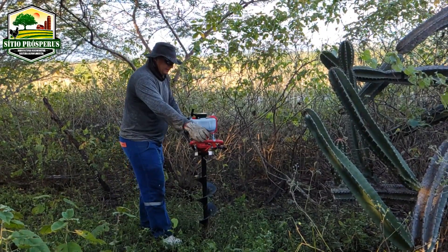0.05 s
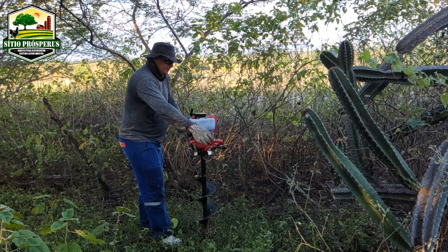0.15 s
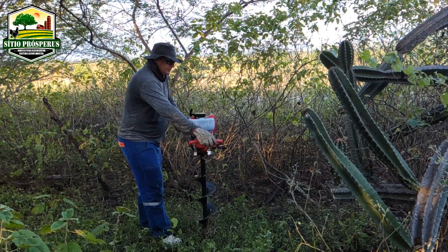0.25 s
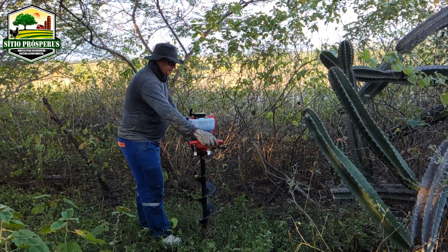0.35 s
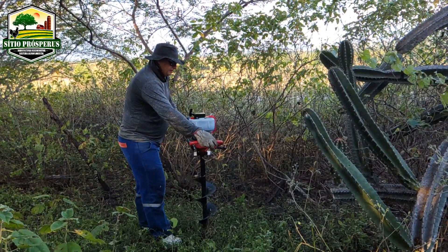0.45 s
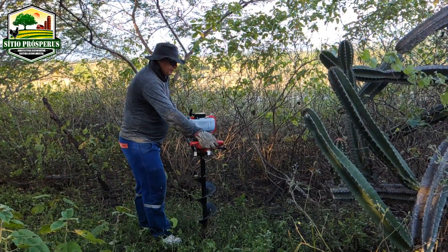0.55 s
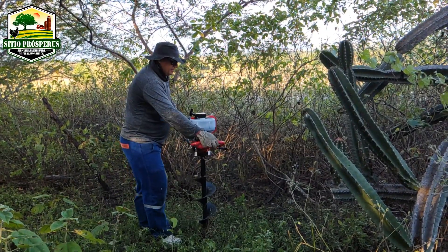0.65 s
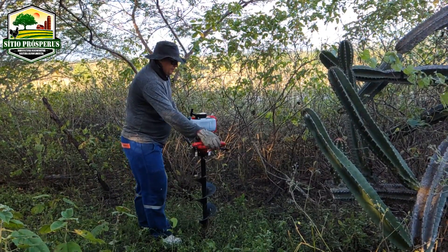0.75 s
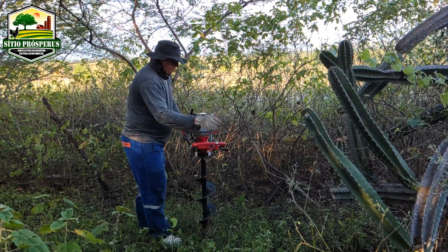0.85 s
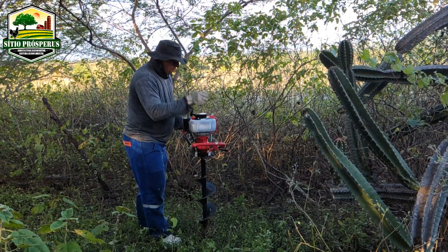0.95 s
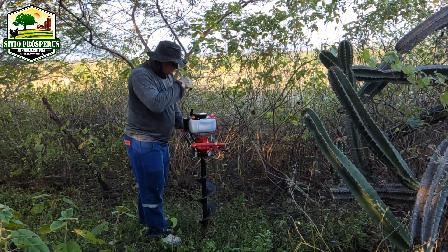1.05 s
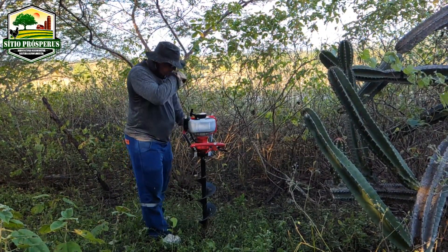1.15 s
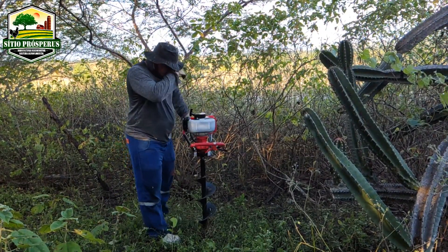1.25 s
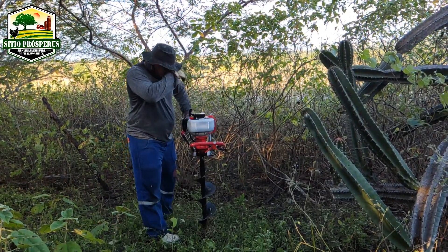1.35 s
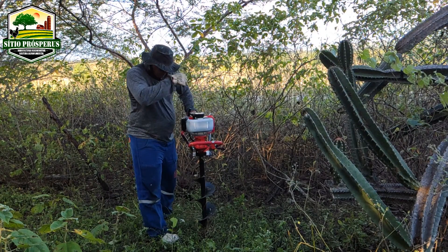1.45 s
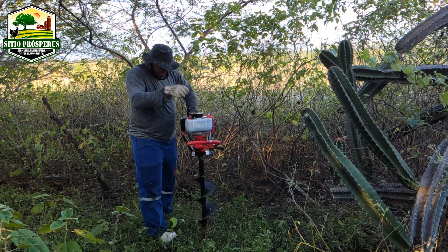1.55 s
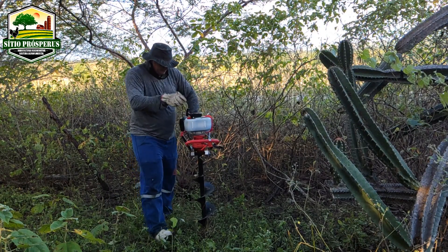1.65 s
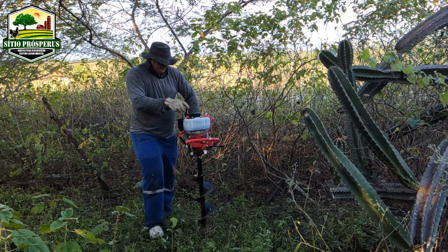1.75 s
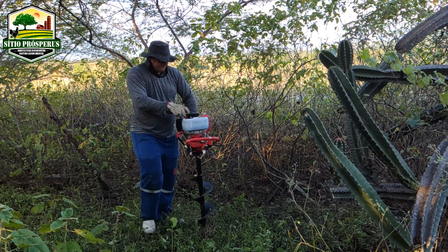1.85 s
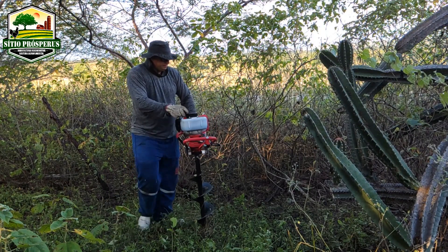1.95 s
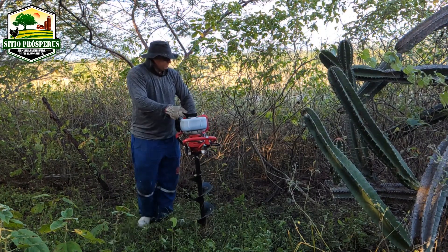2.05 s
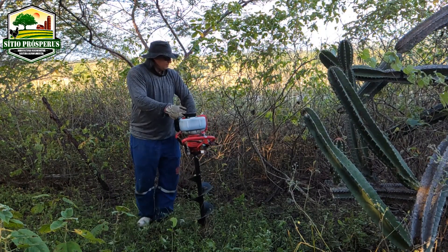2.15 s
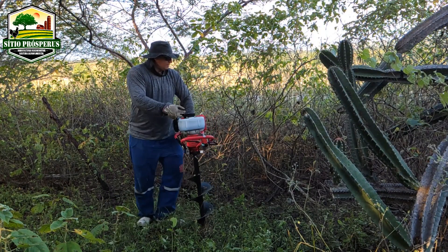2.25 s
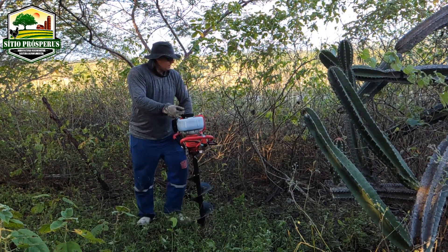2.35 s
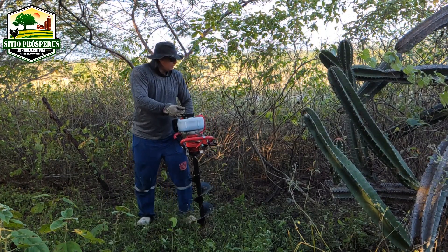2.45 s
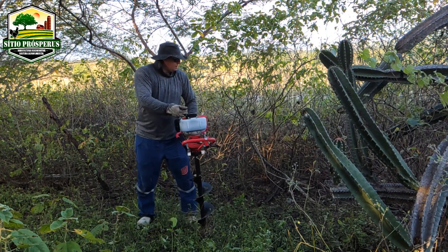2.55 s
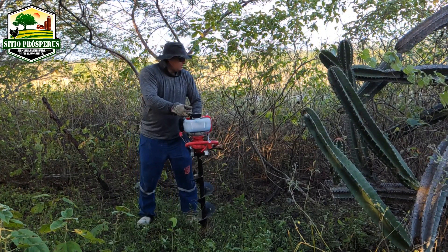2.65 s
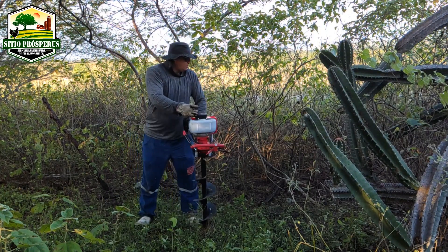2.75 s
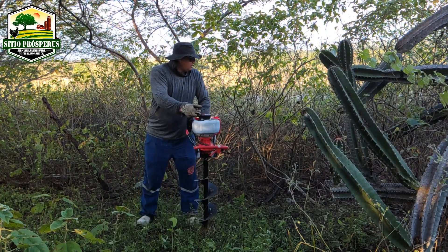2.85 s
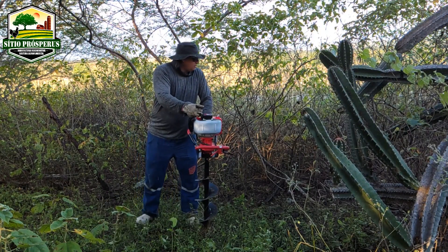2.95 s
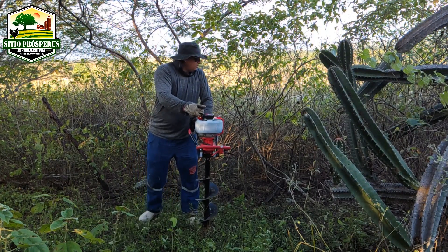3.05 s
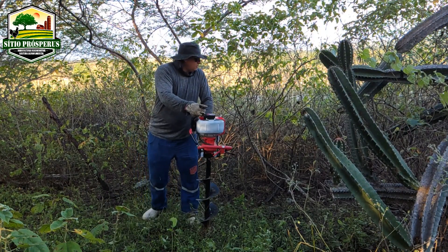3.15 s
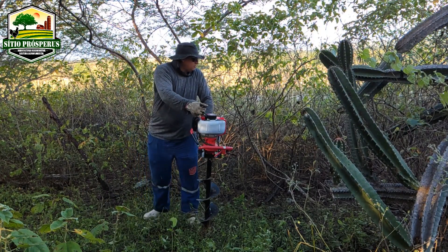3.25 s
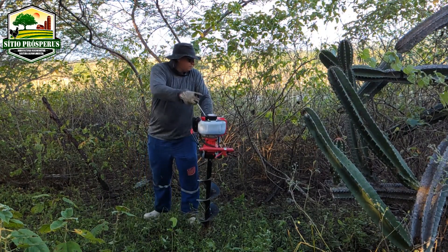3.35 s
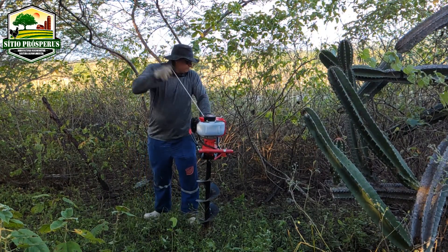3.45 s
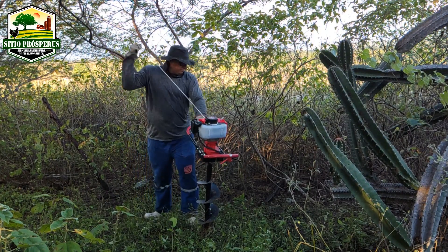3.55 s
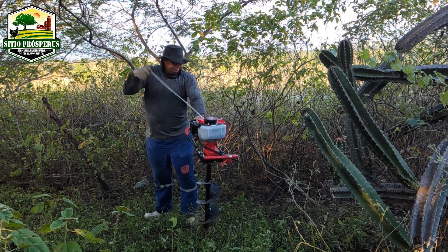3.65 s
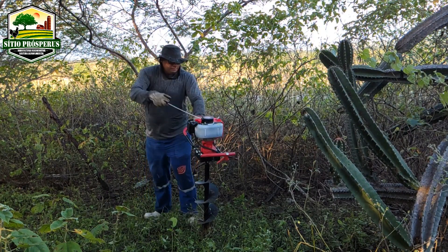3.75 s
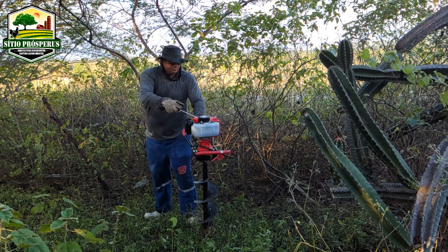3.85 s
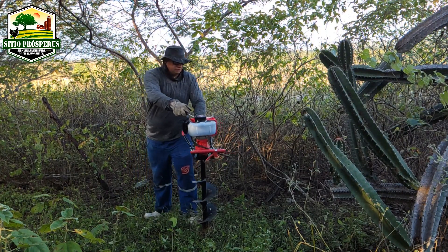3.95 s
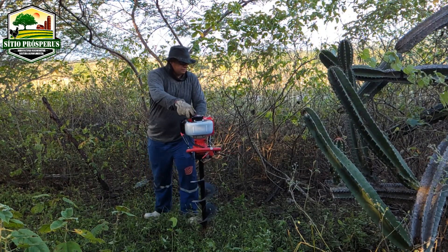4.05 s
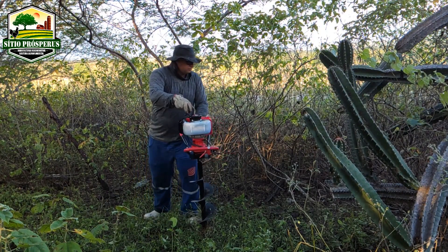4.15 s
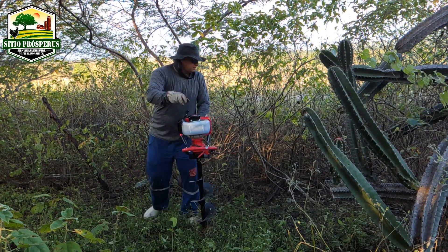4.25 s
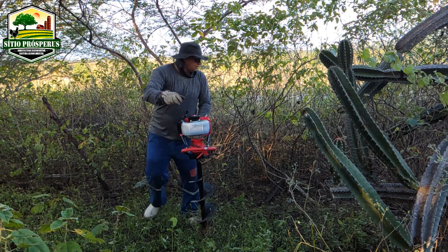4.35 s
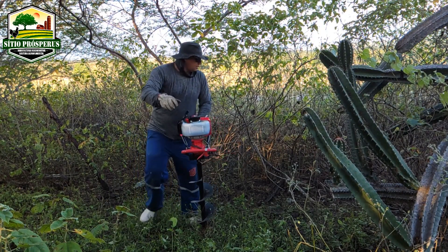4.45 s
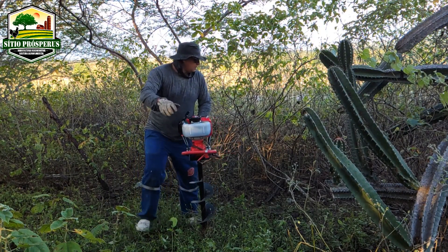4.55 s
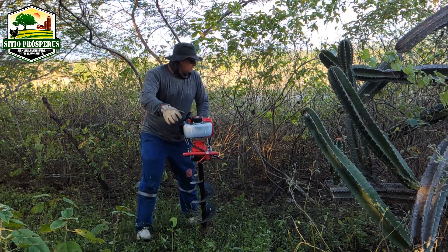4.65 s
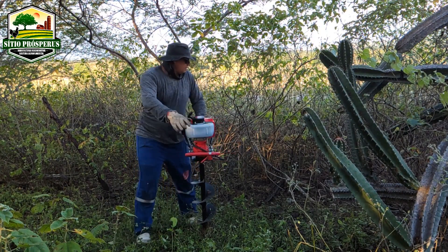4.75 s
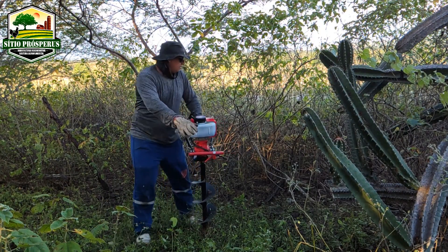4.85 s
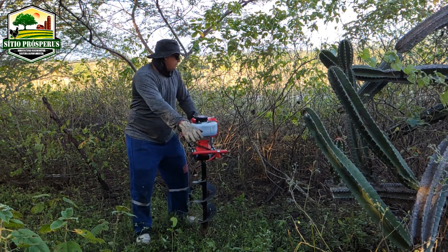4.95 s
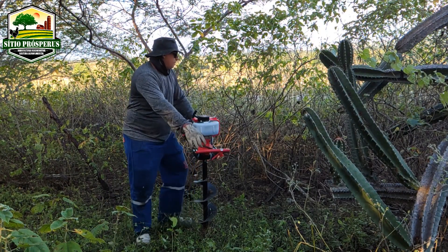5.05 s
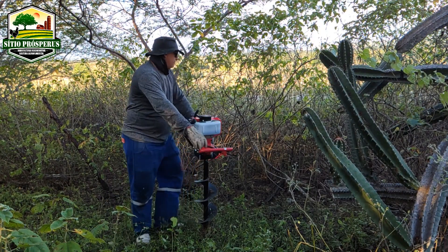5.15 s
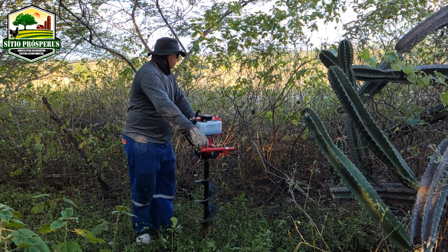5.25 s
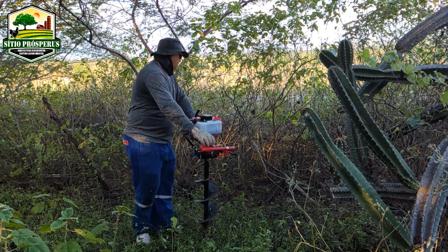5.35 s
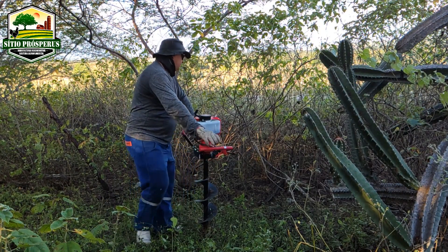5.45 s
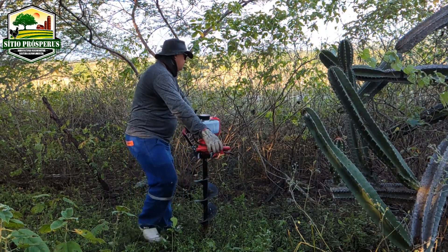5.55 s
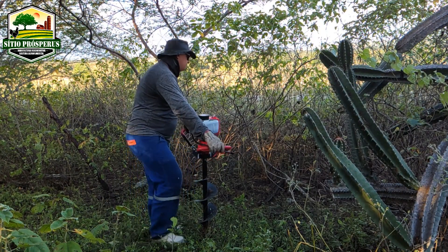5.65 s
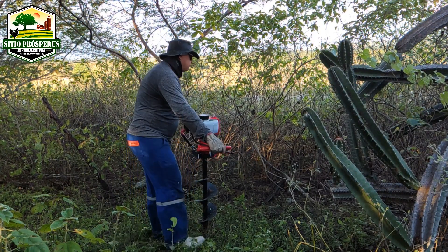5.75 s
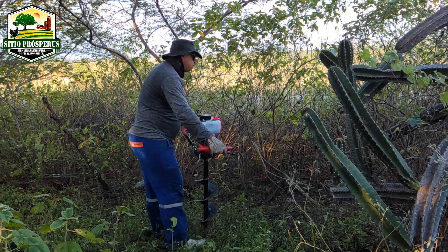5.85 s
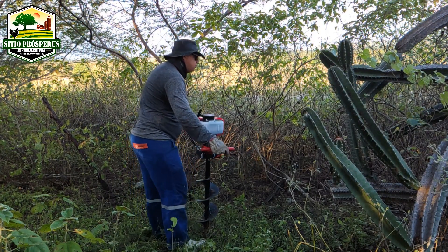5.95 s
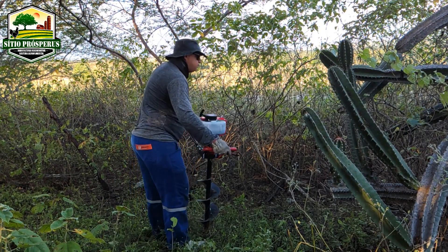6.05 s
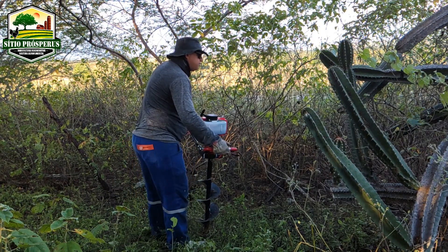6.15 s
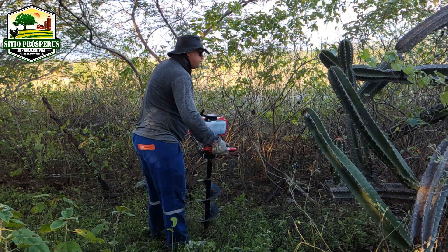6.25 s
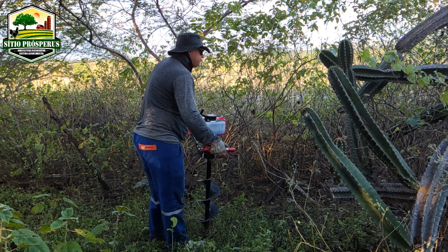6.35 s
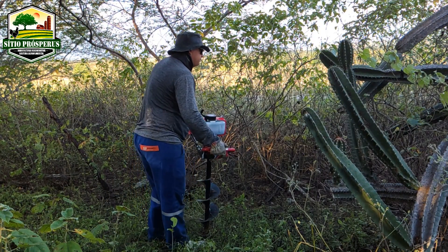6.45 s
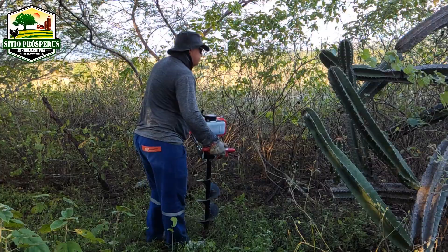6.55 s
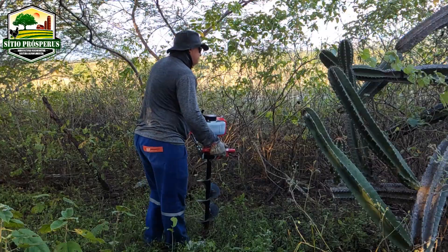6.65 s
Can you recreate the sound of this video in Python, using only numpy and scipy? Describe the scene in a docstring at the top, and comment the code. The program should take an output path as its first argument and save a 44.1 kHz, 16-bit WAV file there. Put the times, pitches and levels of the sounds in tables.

```python
"""Pull-starting an earth auger in the scrub

A small two-stroke auger is pull-started in quiet scrub, a few metres away, and idles unevenly.
First come low outdoor rumble, rustling leaves and faint chirps, made of coloured noise and gliding tones.
The crank turns about 50 times a second, but fires only on every second to sixth turn: a sharp noise crack.
Every turn kicks ringing resonances of the muffler and the air intake.
Shaped noise makes the hiss of the fan and the clatter of the casing and loose parts."""
import sys
import numpy as np
from scipy import signal
from scipy.fft import rfft, irfft
from scipy.io import wavfile
from scipy.ndimage import uniform_filter1d

SR = 44100
rng = np.random.default_rng(int(sys.argv[2]) if len(sys.argv) > 2 else 0)


def unload_audio(sound):
    """Save the sound as a 16-bit wav file, at the path given as the first command line argument."""
    columns = np.transpose(np.atleast_2d(sound))
    # keep every value between -1 and 1, then stretch to whole-number steps
    steps = np.round(np.clip(columns, -1, 1) * 32767)
    wavfile.write(sys.argv[1], SR, steps.astype(np.int16))


N = 295866
TIME = np.arange(N) / SR  # s
START = 3.497  # the rope spins the crank (s)

# one row a firing: start_s, relative_crack_level_db
FIRINGS = [(3.5445, -24), (3.6179, -22), (3.71, -23), (3.781, -30.5), (3.829, -21), (3.8944, -36.5),
           (3.9396, -32.5), (3.985, -26.5), (4.049, -22.5), (4.129, -23.5), (4.2086, -21), (4.287, -24),
           (4.3636, -31), (4.403, -41), (4.523, -23), (4.6031, -24), (4.6647, -29.5), (4.7043, -29),
           (4.766, -26.5), (4.8282, -24), (4.91, -20.5), (4.9692, -28), (5.051, -28), (5.1104, -27.5),
           (5.1694, -25), (5.23, -28.5), (5.2881, -27), (5.3492, -37), (5.3889, -22.5), (5.467, -25.5),
           (5.5258, -22.5), (5.584, -25), (5.641, -30), (5.6992, -26.5), (5.7571, -23.5), (5.8347, -25.5),
           (5.9117, -25), (5.9679, -35), (6.0258, -32), (6.084, -23.5), (6.1582, -24.5), (6.235, -35),
           (6.2919, -26.5), (6.3467, -33.5), (6.385, -27.5), (6.4414, -32), (6.4767, -30.5), (6.516, -36),
           (6.5525, -30), (6.61, -29), (6.6463, -29.5)]
# colour of the fan hiss, also used for ticks: pitch_hz, relative_level_db (per Hz)
FAN_COLOUR = [(600, -43), (1500, 5), (3000, -12), (5000, 10.5), (6800, 6.5), (8400, 18), (10200, 14),
              (11200, 11), (12500, -36), (14200, -35)]
# how alike left and right are for nearby sounds: pitch_hz, likeness (0-1)
NEAR = [(100, 1), (640, 1), (1400, 0.87), (3080, 0.83), (6780, 0.58), (10000, 0.37), (14900, 0)]
# the same for sounds from all around: pitch_hz, likeness (0-1)
DIFFUSE = [(60, 0.75), (290, 0.67), (640, 0.0022), (14900, 0)]


def amp(db):
    """Turns decibels into a gain."""
    return 10 ** (np.asarray(db) / 20)


def unit(x):
    """Scales a sound to rms 1."""
    return x / np.sqrt(np.mean(x ** 2) + 1e-20)


def running_unit(x):
    """Scales to rms 1 over the time that the engine runs."""
    return x / np.sqrt(np.mean(x[..., TIME > START] ** 2))


def curve(rows, axis=1):
    """Draws one column of a table as a line through time."""
    rows = np.array(rows)
    return np.interp(TIME, rows[:, 0], rows[:, axis])


def read(points, hz):
    """Reads a table of pitches, with straight lines on a log-pitch axis."""
    f, value = np.transpose(points)
    return np.interp(np.log(hz + 1), np.log(f + 1), value)


def wander(hz):
    """Slow random movement of rms 1, up to about hz."""
    f = np.fft.rfftfreq(N, 1 / SR)
    spectrum = rfft(rng.standard_normal(N)) / (1 + (f / hz) ** 4)
    return unit(irfft(spectrum, N))


def noise(colour, likeness):
    """Stereo noise of rms 1 with a given colour and left-right likeness."""
    f = np.fft.rfftfreq(N, 1 / SR)
    left, other = rfft(rng.standard_normal((2, N)))
    same = np.clip(read(likeness, f), -1, 1)
    right = same * left + np.sqrt(1 - same ** 2) * other
    return unit(irfft(np.array([left, right]) * amp(read(colour, f)), N))


def impulses(times, sizes):
    """Single-sample kicks at the given times."""
    at = np.round(np.asarray(times) * SR).astype(int)
    return np.bincount(np.clip(at, 0, N), sizes, N + 1)[:N]


def bursts(times, sizes, rise, fall):
    """A loudness shape that jumps to each size and dies away (rise and fall in s)."""
    t = np.arange(SR // 6) / SR
    shape = (1 - np.exp(-(t / rise) ** 2)) * np.exp(-t / fall)
    return signal.oaconvolve(impulses(times, sizes), shape / shape.max())[:N]


def swells(rows):
    """Strokes that each rise and fall in one smooth arch."""
    return sum(amp(db) * np.sin(np.pi * np.clip((TIME - s) / length, 0, 1)) ** 2 for s, length, db in rows)


def ring(x, modes, tuning=1):
    """Each kick in x starts fading cosines, whose pitch is the mode's times the tuning."""
    clock = np.cumsum(tuning * np.ones(N)) / SR
    out = 0
    for hz, width, db in modes:
        turn = np.exp(2j * np.pi * hz * clock)
        fade = np.exp(-np.pi * width / SR)
        # turn the pitch down to zero, let the kicks fade there, then turn it back up
        faded = signal.lfilter([1], [1, -fade], x / turn + 1e-18)
        out = out + amp(db) * (turn * faded).real
    return out


def drifting(x, nominal_hz, width, db):
    """One resonance that follows a pitch curve, sounding at 0.94 of its nominal pitch."""
    return ring(x, [(0.94, width, db)], nominal_hz)


def soften(x, hz):
    """A low-pass that rounds off sharp edges, as gas cannot move at once."""
    return signal.sosfilt(signal.butter(3, hz, fs=SR, output="sos"), x)


def band(x, lo_hz, hi_hz):
    """A broad, gentle pass band."""
    return signal.sosfilt(signal.butter(1, [lo_hz, hi_hz], "band", fs=SR, output="sos"), x)


def thicket(x, wet_db, t60):
    """Twigs and ground scatter the treble into a short tail, 60 dB down after t60 seconds."""
    t = np.arange(SR // 4) / SR
    sparse = rng.standard_normal((2, len(t))) * (rng.random((2, len(t))) < .1)
    taps = sparse * amp(-60 * t / t60) * (t > .003)
    taps /= np.linalg.norm(taps, axis=1, keepdims=True)
    bright = signal.sosfilt(signal.butter(1, 1200, "high", fs=SR, output="sos"), x)
    return x + amp(wet_db) * signal.oaconvolve(bright, taps, axes=1)[:, :N]


def scrub():
    """Low outdoor rumble, a low band that swells and fades, rustling leaves and sleeves, and the birds."""
    # colours of the rumble, the low band and the rustle: pitch_hz, relative_level_db (per Hz)
    air_colour = [(12, -20), (20, 14), (32, -3.5), (82, 4.5), (167, -8.5), (232, -10), (351, -17.5),
                  (517, -19), (593, -17), (1560, -23.5), (4820, -27.5), (5680, -20), (6700, -27),
                  (8830, -30), (14500, -23)]
    low_colour = [(120, -36), (215, -3.5), (240, -3), (275, -1), (400, -50), (1000, -70)]
    rustle_colour = [(4000, -17.5), (6500, -12.5), (8300, 3), (10200, 3), (12000, -5.5), (14500, -16)]
    # the low band swells: start_s, length_s, level_db
    low_swells = [(.45, 0.26, -60), (.92, 0.12, -59), (1.15, .09, -60.5), (1.6, 0.12, -61),
                  (2.3, 0.22, -61), (2.75, 0.11, -57)]
    # sleeves and grass swish as the worker shifts: start_s, length_s, level_db
    swishes = [(1.08, 0.54, -61), (1.74, 0.56, -48.5), (2.42, 0.27, -60), (2.98, 0.35, -54.5),
               (3.32, 0.2, -55)]
    leaves_db, low_db = -61, -70.5  # steady levels between the swells
    air = noise(air_colour, DIFFUSE) * amp(-53 + .5 * wander(hz=4.4))
    rustle = noise(rustle_colour, DIFFUSE) * np.hypot(amp(leaves_db), swells(swishes)) * amp(wander(hz=60))
    low = noise(low_colour, NEAR) * np.hypot(amp(low_db), swells(low_swells))
    return air + low + rustle + thicket(birds(), wet_db=-8.5, t60=0.18)


def birds():
    """Phrases of short falling notes, loudest in the middle and blurred by the bushes."""
    # phrases of small distant birds: start_s, length_s, pitch_hz, level_db
    phrases = [(0.06, 0.16, 6200, -59), (0.2, 0.084, 2640, -62), (0.235, 0.56, 5520, -56),
               (0.386, 0.047, 5900, -51), (0.867, 0.18, 5620, -55.5), (1.337, 0.093, 5450, -56),
               (2.2, .07, 5700, -61), (2.607, .08, 5720, -61), (2.997, .08, 5530, -58),
               (3.197, 0.11, 5140, -57), (3.235, .13, 5900, -60), (3.317, 0.08, 3650, -62)]
    note_s, rise_s, fall = 0.07, 0.025, 0.5  # note spacing, time to peak, fall in pitch (share per s)
    # slow random noise turns each pure tone into a narrow band
    blur = soften(rng.standard_normal((2, N)) + 1j * rng.standard_normal((2, N)), hz=220)
    out = np.zeros((2, N))
    for s, length, hz, db in phrases:
        span = (TIME > s) & (TIME < s + length)
        t = TIME[span] - s
        age = t % note_s
        note = age / rise_s * np.exp(1 - age / rise_s)
        arch = np.sqrt(np.sin(np.pi * t / length))
        pitch = hz * (1 - fall * (age - note_s / 2))
        glide = np.exp(2j * np.pi * np.cumsum(pitch) / SR)
        out[:, span] += amp(db) * note * arch * unit((blur[:, span] * glide).real)
    return out


def clicks():
    """Bright ticks are noise bursts; dull knocks add a short ring, longer when it is low."""
    # ticks of twigs and of the starter's pawls: start_s, level_db, decay_s
    tick_rows = [(0.581, -42.5, 0.002), (0.819, -53, .004), (1.211, -52, 0.0028), (2.783, -56, .004),
                 (2.901, -49, 0.0063), (3.571, -20, 0.0079)]
    # knocks on the machine: start_s, relative_thud_level_db, ring_pitch_hz, ring_level_db
    knocks = [(2.348, -49.5, 670, -55), (2.606, -60, 525, -51.5), (2.85, -57, 785, -62),
              (3.379, -36, 1082, -45), (3.39, -42, 995, -54), (3.494, -33.5, 1110, -38),
              (3.526, -40, 630, -39), (3.548, -27, 975, -45), (3.557, -29, 1100, -41),
              (3.567, -23, 1110, -34), (3.576, -29.5, 1160, -28), (3.668, -22, 574, -33)]
    thud_colour = [(200, -10), (600, 1.5), (1150, 1.5), (1800, -8.0), (3000, -5.5), (5000, -18.0)]
    tick_shape = sum(bursts([at], [amp(db)], rise=0.0032, fall=decay) for at, db, decay in tick_rows)
    ticks = tick_shape * noise(FAN_COLOUR, NEAR)
    s, thud_db, hz, ring_db = np.transpose(knocks)
    edge = bursts(s, amp(thud_db - 11.5), rise=0.0012, fall=0.0043) * noise(FAN_COLOUR, NEAR)
    body = bursts(s, amp(thud_db - 6.0), rise=0.0013, fall=0.0064) * noise(thud_colour, NEAR)
    tone = sum(ring(impulses([at], [amp(db)]), [(f, f / 32, 0)]) for at, db, f in zip(s, ring_db, hz))
    return ticks + edge + tone + body


def starter():
    """Gloves and rope rub as swelling noise; the first compression thumps through the muffler."""
    # gloves rub on the machine, then the rope tightens and runs out: start_s, length_s, level_db
    rubs = [(1.11, 0.12, -65), (1.3, 0.23, -62.5), (3.33, 0.22, -56), (3.49, 0.35, -42.5)]
    rub_colour = [(150, -22), (600, 14.0), (1150, 8.0), (1800, 7.5), (3000, 4.5),
                  (5500, 10.0), (8500, 0), (14000, -25)]
    thump = soften(ring(impulses([3.5045], [amp(-23.5)]), [(111, 47, 0)]), hz=398)
    return noise(rub_colour, NEAR) * swells(rubs) + thump


def crank():
    """Crank angle in turns, whole near exhaust opening, and the fired turns; the flywheel evens the speed."""
    # crank speed: start_s, turns_per_s
    speed = [(3.6, 42), (3.8, 42), (4, 46), (4.2, 51), (4.8, 49), (5.5, 51), (6.6, 54)]
    s = np.array(FIRINGS)[:, 0]
    s = np.concatenate([[START], s, [s[-1] + 10 / speed[-1][1]]])
    # a whole number of turns fits between one firing and the next
    steps = np.round(np.diff(s) * np.interp(s[1:], *np.transpose(speed)))
    turns = np.concatenate([[0], np.cumsum(steps)])
    uneven = np.interp(TIME, s, turns) + np.minimum(TIME - START, 0) * speed[0][1]
    even_steps = uniform_filter1d(np.gradient(uneven), size=4000)
    return uneven[0] + np.cumsum(even_steps), turns[1:-1]


def strokes(angle, phase):
    """The moments at which the crank passes a point of its turn."""
    points = np.arange(int(angle[-1]) + 1) + phase
    running = TIME >= START
    return np.interp(points, angle[running], TIME[running], right=TIME[-1] + 1)


def driven(level_db, share):
    """The gain of a layer that follows the engine's changing loudness by share dB per dB."""
    # the engine's loudness rises and dips: start_s, level_db
    engine_level = [(3.55, 5), (3.8, -0.5), (4.1, 0), (4.4, -0.5), (4.7, 1.5), (5.0, 0.7), (5.45, -0.5),
                    (5.9, 1.5), (6.3, 0.5), (6.7, -0.5)]
    return amp(level_db + share * curve(engine_level))


def machinery(angle):
    """Piston slap rattles the casing once a turn, unevenly; the fan hisses, air rushes, loose parts tick."""
    # casing resonances: pitch_hz, width_hz, relative_level_db
    casing_modes = [(1156, 146, -0.5), (1453, 180, -4), (1950, 200, -1.5), (2466, 330, 2.5),
                    (3060, 310, -5), (3800, 190, -11)]
    # colour of the rushing air: pitch_hz, relative_level_db (per Hz)
    rush_colour = [(25, -18), (70, -8), (170, 7), (260, 3), (400, -1), (680, 2), (880, 1), (1200, -2),
                   (1800, -15), (4000, -42)]
    on = np.clip((TIME - START + 0.0062) / 0.0069, 0, 1)
    slap = amp(2.4 * np.cos(2 * np.pi * (angle - .8)) + 1.8 * wander(hz=120))
    shake = noise([(300, 3.9), (1000, 0.78), (4000, 2.3), (7000, 6.4)], NEAR) * slap * on
    # each resonance gets its own random loudness
    casing = running_unit(sum(ring(shake * amp(1.7 * wander(hz=73.0)), [mode]) for mode in casing_modes))
    fan = noise(FAN_COLOUR, NEAR) * amp(3.1 * wander(hz=150))
    rush = noise(rush_colour, NEAR) * amp(-50 + 1.2 * wander(hz=40))
    times = strokes(angle, phase=0.1)
    delay, softness = rng.random((len(times), 2)).T
    tick_shape = bursts(times + 0.0042 * delay, amp(-24.5 - 31 * softness), rise=0.00048, fall=0.00092)
    ticks = tick_shape * noise(FAN_COLOUR, NEAR)
    hiss = on * (driven(level_db=-44, share=0.72) * fan + rush)
    return driven(level_db=-40.5, share=0.1) * casing + hiss + ticks


def exhaust(angle, fired):
    """Fired turns bang, harder with a fuller charge; others suck back; fresh charge then pumps the muffler."""
    # resonances of the muffler and of the firing: pitch_hz, width_hz, relative_level_db
    muffler = [(100, 75, -1), (185, 45, -5)]
    bang = [(127, 86, 1), (480, 270, 4), (1247, 73, 5)]
    # the low exhaust resonance glides up, drops near 5.4 s, then stays low:
    # start_s, nominal_pitch_hz, relative_level_db
    chamber_path = [(3.6, 330, 3), (3.9, 347, 2.5), (4.1, 388, 6.5), (4.35, 433, 6), (4.6, 420, 4),
                    (4.85, 450, 3.5), (5.1, 470, -1), (5.4, 394, -1), (6, 380, 5.5), (6.6, 390, 3.5)]
    opens = strokes(angle, phase=0)
    lit = np.isin(np.arange(len(opens)), fired)
    s, crack_db = np.transpose(FIRINGS)
    charge = amp(0.36 * (np.interp(opens, s, crack_db) - crack_db.mean()))
    chance = amp(.9 * rng.standard_normal((len(opens), 2)).T)
    port_sizes = np.where(lit, 1.35 * charge, -.6) * chance[0]
    port = impulses(opens - np.where(lit, .0003, .0005), port_sizes)
    push = impulses(strokes(angle, phase=.035), .55 * chance[1])
    chamber_kicks = (push + 0.35 * port) * amp(curve(chamber_path, axis=2))
    chamber = drifting(chamber_kicks, curve(chamber_path), width=70, db=-2.5)
    ringing = ring(port, bang) + ring(push, muffler) + chamber
    puffs = running_unit(band(soften(ringing, hz=630), lo_hz=54.0, hi_hz=4000))
    # after the first compression the exhaust builds up from 15 dB short
    build = amp(-15 * np.exp(-np.maximum(TIME - START, 0) / 0.13))
    # the pumping piston also hums steadily, once and twice a turn
    hum = -np.sin(2 * np.pi * angle) * amp(-41.0) + np.cos(4 * np.pi * (angle - .06)) * amp(-47.5)
    return driven(level_db=-37, share=0.79) * build * puffs + hum * np.clip((TIME - START) / 0.32, 0, 1)


def intake(angle, fired):
    """Half a turn later the piston uncovers the inlet; the gulp echoes along the pipe and rings the air box."""
    # the inlet pipe: start_s, nominal_pitch_hz, intake_level_db
    pipe_path = [(3.55, 630, -36), (3.75, 567, -37), (3.9, 573, -35), (4.07, 626, -38), (4.3, 560, -44.5),
                 (4.55, 528, -41.5), (4.75, 550, -40.5), (5.0, 610, -39.5), (5.2, 610, -41),
                 (5.45, 600, -44), (5.9, 585, -38), (6.3, 614, -39), (6.7, 610, -41)]
    # the upper inlet resonance shifts in pitch and level: start_s, nominal_pitch_hz, relative_level_db
    upper_path = [(3.85, 590, -5), (4.07, 650, 1), (4.35, 735, -1), (4.7, 690, -2), (5.1, 720, 1),
                  (5.5, 720, -2), (6, 750, -3), (6.6, 785, -2)]
    # air box resonances: pitch_hz, width_hz, relative_level_db
    box_modes = [(177, 57, -17), (1210, 130, -33)]
    # a gulp runs to and fro in the pipe: delay_round_trips, strength (minus is earlier, or upside down)
    pipe_echoes = [(-.5, -.45), (0, 1), (1, .85), (2, .2)]
    times = strokes(angle, phase=.53)
    lit = np.isin(np.arange(len(times)), fired)
    late, loud = rng.standard_normal((len(times), 2)).T
    # after a firing the crank runs ahead (s) and gulps harder (dB); each gulp also varies by chance
    times = times - .0003 * lit + .00016 * late
    size = amp(2 * lit + 1.4 * loud)
    # the pipe's pitch flutters by chance
    pipe_hz = curve(pipe_path) * (1 + 0.025 * wander(hz=40.3))
    trip = 1 / np.interp(times, TIME, pipe_hz)
    gulps = sum(impulses(times + trips * trip, strength * size) for trips, strength in pipe_echoes)
    pipe = drifting(gulps, pipe_hz, width=100, db=-12)
    upper_kicks = impulses(times, size) * amp(curve(upper_path, axis=2))
    upper = drifting(upper_kicks, curve(upper_path), width=85, db=-3)
    box = gulps + amp(-16.5) * (pipe - upper + ring(gulps, box_modes))
    puffs = running_unit(band(soften(box, hz=900), lo_hz=272, hi_hz=3000))
    return amp(curve(pipe_path, axis=2)) * np.clip((TIME - START) / 0.12, 0, 1) * puffs


def cracks():
    """Each firing sends a sharp, ragged jet of hot gas through the outlet; the bushes scatter it."""
    # colours of the high jet and of its lower treble, the bite: pitch_hz, relative_level_db (per Hz)
    jet_colour = [(1500, -78), (4500, -27.5), (6300, -10.5), (7400, -6), (8300, 4.5), (9200, -1),
                  (10200, 2), (11200, -6.5), (12500, -12), (14200, -19.5)]
    bite_colour = [(400, -33), (800, -32), (1300, 6.5), (1800, -5), (2600, -2.5), (3300, 8), (4000, 3.5),
                   (4700, 5.5), (5300, 7.5), (6100, 8.5), (7500, 5), (10000, -29)]
    s, db = np.transpose(FIRINGS)
    # the bite changes less from firing to firing than the jet
    jet_size, bite_size = amp(db + 10.5), amp(-2.5 + 0.84 * db)
    jet = bursts(s + 0.00036, jet_size, rise=0.0009, fall=0.0022) * noise(jet_colour, NEAR)
    bite = bursts(s + 0.00048, bite_size, rise=0.0009, fall=0.003) * noise(bite_colour, NEAR)
    scatter = sum(bursts(s + 0.0019, size, rise=0.0039, fall=0.015) * noise(colour, DIFFUSE)
                  for size, colour in [(jet_size, jet_colour), (bite_size, bite_colour)])
    ragged = amp(1.2 * wander(hz=1500))
    return glancing((jet + panned(bite, right_db=0.5) + amp(-13.5) * scatter) * ragged, s)


def panned(x, right_db):
    """Leans a stereo sound to the right."""
    return x * amp(np.array([[-right_db], [right_db]]) / 2)


def glancing(x, times):
    """Adds a close reflection, which colours the sound; its delay changes at each of the times."""
    shortest_s, longest_s, strength = 0.0004, 0.0011, 0.8
    delay_s = shortest_s + (longest_s - shortest_s) * rng.random(len(times) + 1)
    delay = np.round(SR * delay_s).astype(int)
    earlier = np.maximum(np.arange(N) - delay[np.searchsorted(times, TIME)], 0)
    return (x + strength * x[:, earlier]) / np.hypot(1, strength)


def scene():
    """The auger among the bushes."""
    angle, fired = crank()
    auger = clicks() + starter() + machinery(angle) + exhaust(angle, fired) + intake(angle, fired)
    return scrub() + thicket(auger, wet_db=-5.0, t60=0.043) + cracks()


def record(dry):
    """A steep low-pass takes away the very highest treble."""
    lowpass = signal.firwin(301, 14450, window=("kaiser", 8), fs=SR)
    return signal.oaconvolve(dry, lowpass[None], "same")


dry = scene()
out = record(dry)
unload_audio(out)
```